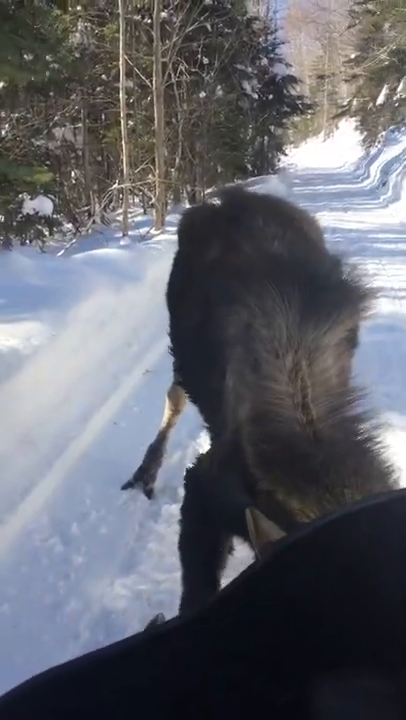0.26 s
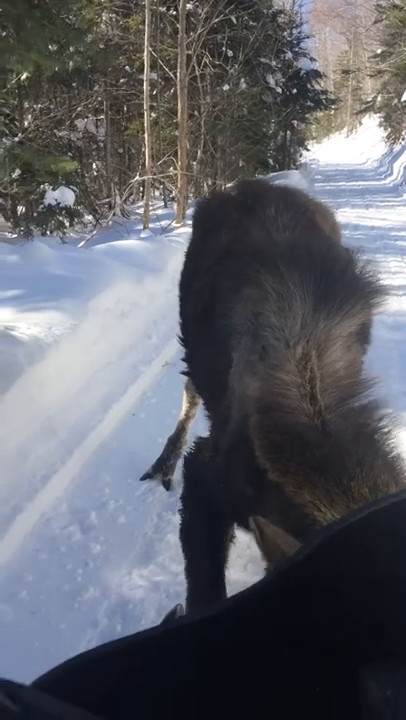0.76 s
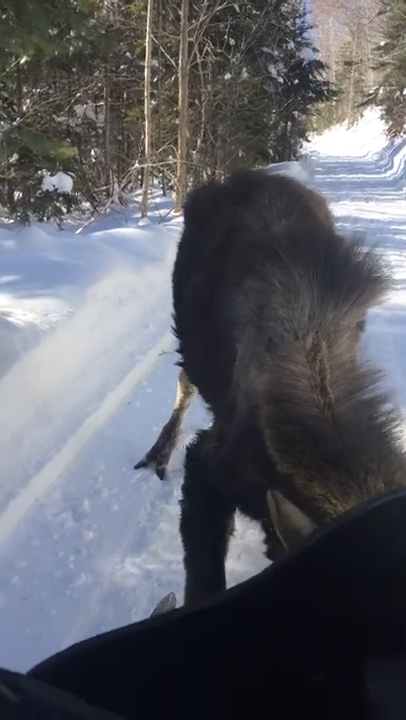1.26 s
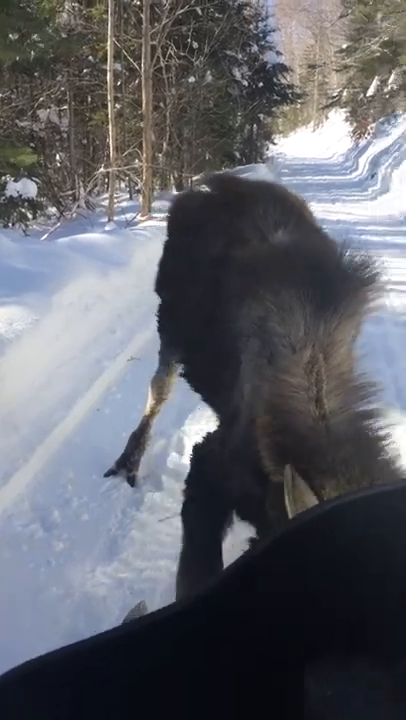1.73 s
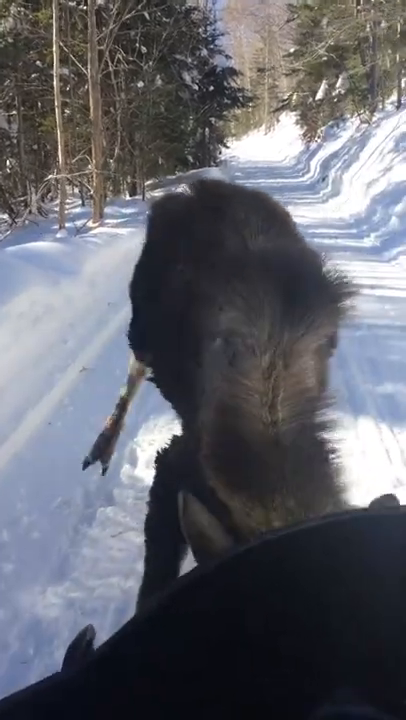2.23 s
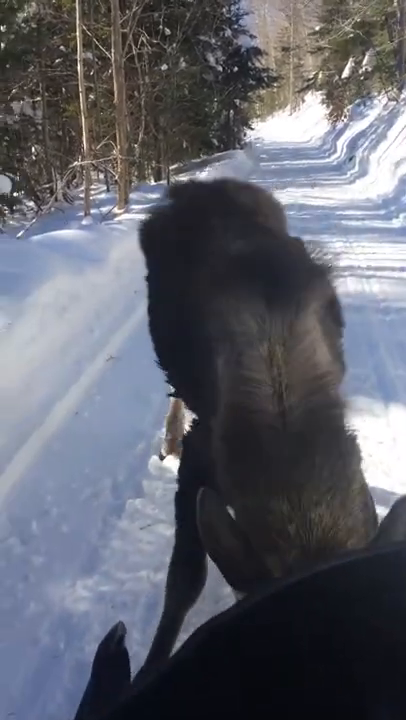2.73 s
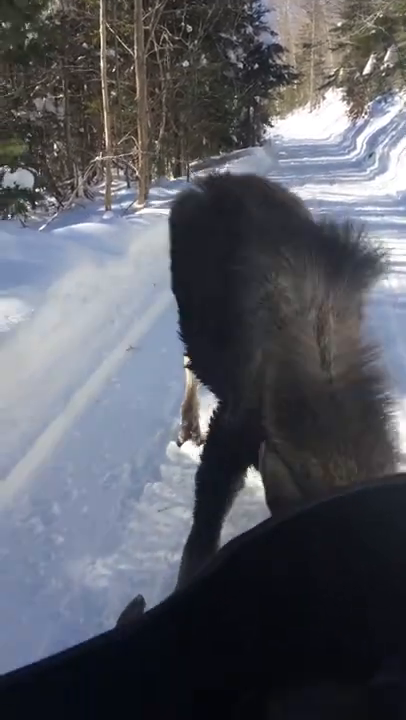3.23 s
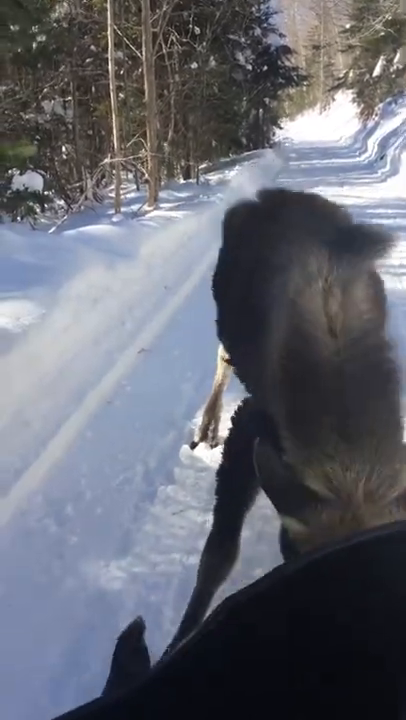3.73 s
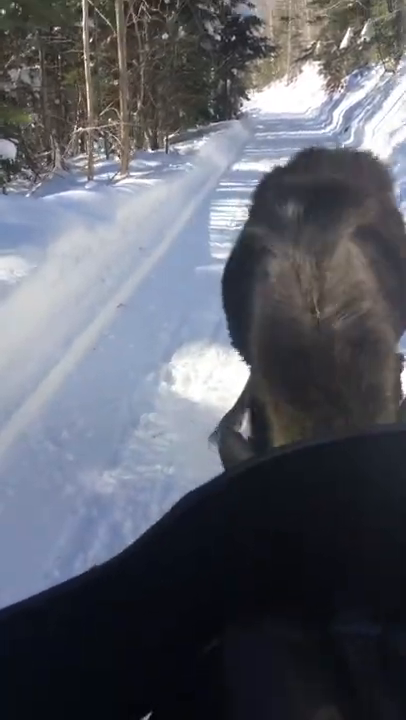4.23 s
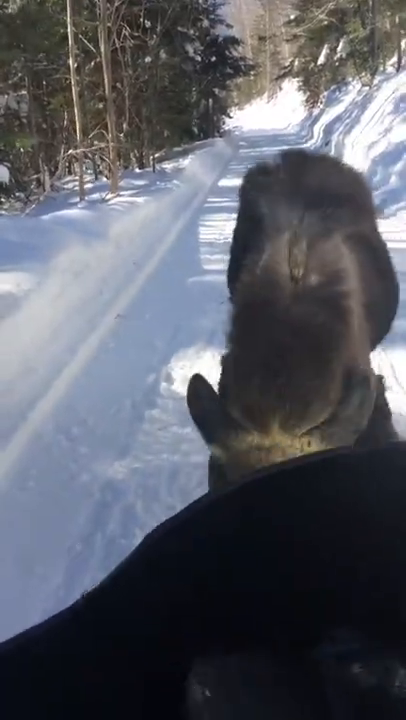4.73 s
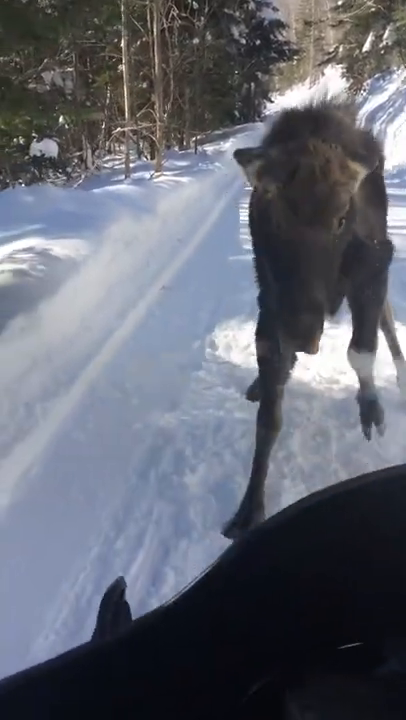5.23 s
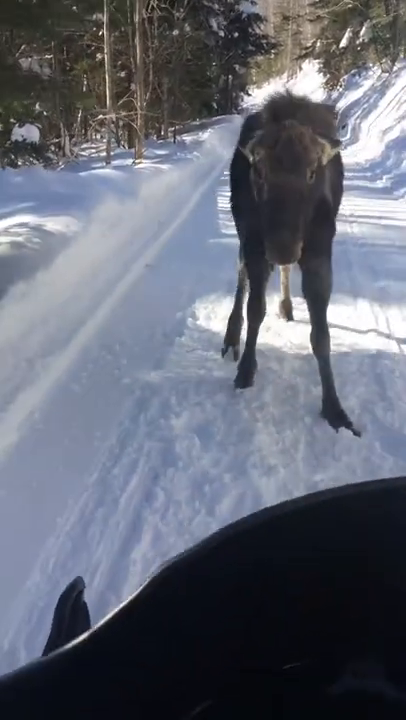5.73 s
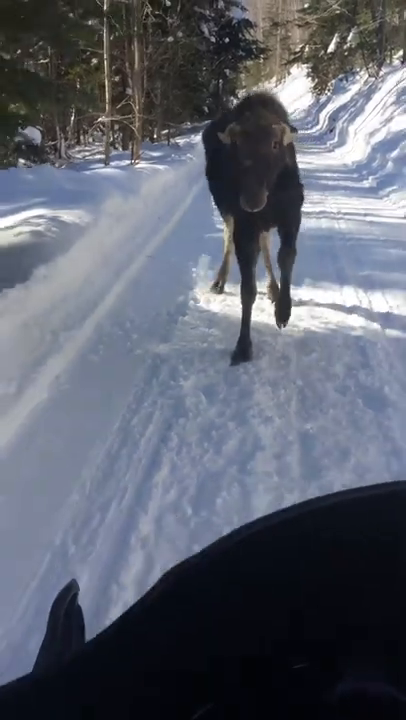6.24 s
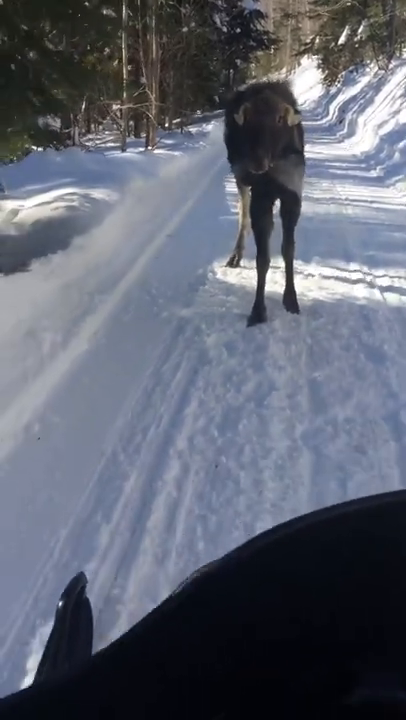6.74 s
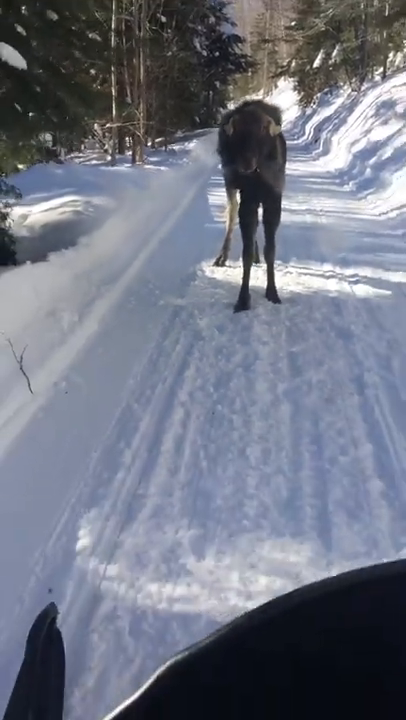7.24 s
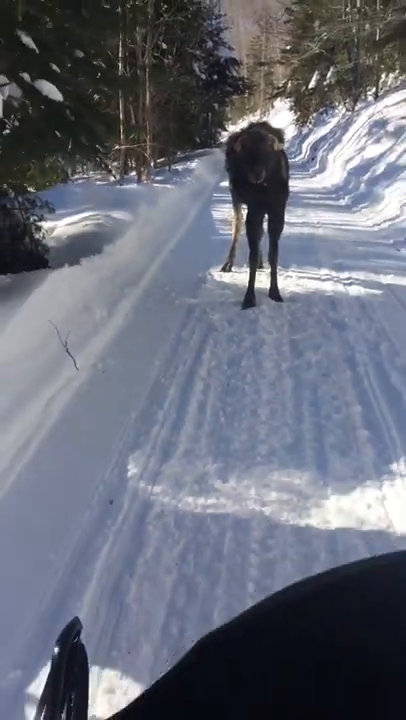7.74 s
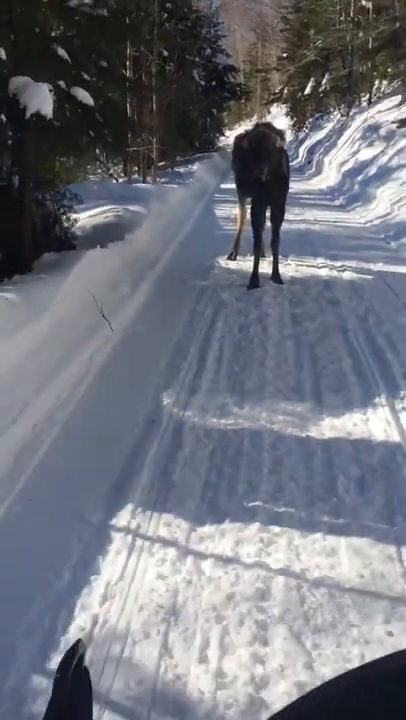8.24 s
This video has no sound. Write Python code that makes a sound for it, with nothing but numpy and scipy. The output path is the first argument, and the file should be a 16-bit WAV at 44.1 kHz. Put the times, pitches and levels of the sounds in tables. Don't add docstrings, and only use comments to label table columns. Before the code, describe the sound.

Close, loud two-stroke snowmobile idling for three seconds, then rapid repeated revs with buzzing barks, rattling parts and belt and track whirr.

```python
import sys
import numpy as np
from scipy import signal
from scipy.fft import rfft, irfft
from scipy.io import wavfile
from scipy.ndimage import uniform_filter1d, minimum_filter1d

SR = 44100
rng = np.random.default_rng(int(sys.argv[2]) if len(sys.argv) > 2 else 0)


def gain_from_db(level_db):
    decades = np.asarray(level_db, float) / 20
    return 10 ** decades


def wrap_up_sound(samples):
    columns = np.atleast_2d(samples).T
    tamed = np.clip(columns, -1, 1)
    steps = np.round(tamed * 32767).astype(np.int16)
    wavfile.write(sys.argv[1], SR, steps)


N = 373968

# start_s, speed_hz (cycles per second), bark level_db
IDLING = [
    (0.0, 37.8, -9.5),
    (0.3, 37.1, -12.5),
    (0.58, 37.12, -11),
    (1.2, 36.68, -12),
    (1.4, 35.4, -11),
    (1.56, 36.77, -11),
    (2.1, 36.78, -11.5),
    (2.65, 37.25, -10.5),
    (2.85, 39.44, -11.5),
    (2.91, 45.1, -11),
]
# first_burn_s, last_burn_s, speed_before_hz, speed_after_hz, rasp_db
BLIPS = [(2.9489, 3.021, 43.3, 65, -32.5), (3.2462, 3.4004, 54, 97, -27.5), (3.5407, 3.64, 85, 107, -23.5),
         (3.635, 3.9282, 105.5, 99.4, -28.5), (4.3559, 4.4884, 61.1, 97, -26.5),
         (4.6357, 4.7054, 77.9, 107, -24.5), (4.9196, 4.981, 76.3, 90, -25),
         (5.1538, 5.246, 74.3, 100.8, -27.5), (5.4172, 5.499, 75.34, 105.4, -25.5),
         (5.6689, 5.75, 75.5, 93.2, -27), (5.9342, 6.022, 69.37, 96.3, -28.5),
         (6.1913, 6.2775, 73.6, 103.6, -26), (6.471, 6.551, 73.4, 94.6, -28.5),
         (6.7048, 6.8773, 70.35, 113.6, -27.5), (7.3902, 7.5322, 61.9, 97.7, -29.5),
         (7.7012, 7.8248, 77.54, 113.5, -27.5), (8.0274, 8.166, 75.8, 93, -29.5)]
# first_s, last_s, bark_db
RELIGHTS = [
    (3.157, 3.157, -6.5),
    (3.4801, 3.4801, -7.0),
    (4.2254, 4.2909, -8.8),
    (4.3234, 4.3234, -6.5),
    (4.8392, 4.8392, -9.7),
    (5.864, 5.864, -9.7),
    (7.1507, 7.358, -8.7),
    (8.287, 8.3442, -8.9),
    (8.3923, 8.4739, -9.0),
]
# time_s, change_db
STUMBLES = [(2.927, -23), (3.135, -7.5), (3.175, 0), (3.443, 4), (3.5, -6), (3.53, 4), (3.96, -1),
            (4.03, 0.5), (4.106, -11.5), (4.15, -2.5), (4.516, -8), (4.8, -6.5), (5.066, -2), (5.366, -3.5),
            (5.886, -2), (6.402, 0.5), (7.094, 0.5), (7.122, -13), (7.365, -3), (7.57, 4.5), (7.64, 9.5),
            (7.97, -5), (8.0, -3), (8.268, -8), (8.38, 3)]

# order (multiple of the cycle rate), level_db
IDLE_ORDERS = [(1, -21), (2, -2.5), (3, -7), (4, -7), (5, -14), (6, -24.5), (7, -22), (8, -23.5),
               (9, -24.5), (10, -25.5), (11, -35), (12, -20), (13, -56)]
# order, level_db
BURN_ORDERS = [(1, -6), (2, 2), (3, -3.5), (4, -6), (5, -11.5), (6, -33), (7, -13), (8, -54)]
# order, level_db
LEAN_ORDERS = [(1, -7), (2, 1), (3, -9), (4, -9.5), (5, -10), (6, -29), (7, -28)]
# order, level_db
COAST_ORDERS = [(1, 0), (2, -5.5), (3, -15), (4, -27.5), (5, -23.5), (6, -38)]
# order, level_db
HOWL_ORDERS = [(4, -1.5), (5, -9)]

# freq_hz, level_db
MUFFLER = [(30, -3), (70, -2), (110, 4), (300, -2), (350, -21), (440, -16.5), (560, -22), (800, -44)]
# freq_hz, width_hz, level_db
BOOM = (86, 33, -7.5)

# time_s, change_db
PUFFS = [(0.32, 3), (0.45, 4.5), (0.57, 3.5), (0.67, 2), (0.78, -3), (0.99, 0.5), (1.06, 5), (1.14, 4.5),
         (1.25, 4.5), (1.411, 6.5), (1.57, 0), (1.65, 6), (1.832, 4.5), (1.99, 5), (2.07, 1), (2.16, 6),
         (2.249, -3), (2.4, 1.5), (2.55, 1.5), (2.71, 3.5), (2.81, 4), (2.87, 6), (2.9, 8.5)]
# freq_hz, level_db (per Hz)
SHUT_RASP = [(240, -44), (400, -2), (536, 1), (645, -10.5), (1130, 1.5), (1230, -8), (1330, 4), (1440, -3),
             (1600, 4), (2150, -3.5), (2400, -12.5), (3530, -13.5), (9920, -39), (16000, -85)]
# freq_hz, level_db (per Hz)
OPEN_RASP = [(260, -21), (450, 0.5), (674, -8), (882, -4.5), (993, 0), (1070, -6), (1150, -3.5), (1490, -1),
             (1810, 2), (2430, -6.5), (3810, -15), (9770, -23.5), (12800, -36), (16000, -54)]
# freq_hz, width_hz, level_db
CASING = [(417.6, 35, 7), (652, 11, 3.5), (972, 50, 2), (1172, 37, 7), (1517, 58, 5), (1860, 27, 8.5),
          (2184, 11, 10.5), (4770, 67, 6)]

# pitch_hz, ring_s, level_db, extra_db on every third
KNOCK = (1570, 0.1, -41, 9)
# freq_hz, level_db (per Hz)
SHAKE = [(20, -50), (40, 19.5), (80, 19), (200, 10.5), (330, -9.5), (600, -40)]
# time_s, level_db
ROLL = [(0, -43), (2.9, -45), (3.301, -32.5), (4.5, -33), (5.5, -31.5), (6.3, -32), (6.601, -31),
        (7.0, -36), (7.5, -29.5), (8.0, -32), (8.48, -31)]
# freq_hz, level_db (per Hz)
WHIRR = [(250, 3), (420, 6), (560, -7), (634, 2.5), (710, -3.5), (1200, -7.5), (1900, -4), (3000, -14),
         (8000, -22.5), (14000, -31)]
# start_s, peak_db, pitch_hz, ring_s
TICKS = [(0.048, -24, 1600, 0.028), (0.187, -27, 1390, 0.039), (1.054, -27, 1560, 0.036),
         (1.247, -43.5, 1100, 0.033), (1.381, -38, 1360, 0.02), (1.635, -37, 1590, 0.013),
         (1.66, -20.5, 1710, 0.043), (2.883, -49, 1860, 0.012), (2.934, -18, 1840, 0.056),
         (2.977, -9, 1250, 0.055), (3.053, -20, 2080, 0.086), (3.228, -10.5, 1770, 0.053),
         (3.305, -12, 1680, 0.18), (3.53, -14, 1850, 0.018), (4.201, -17, 1010, 0.046),
         (4.284, -15, 1860, 0.041), (4.315, -19, 1410, 0.012), (4.347, -14.5, 1860, 0.07),
         (4.63, -11, 2130, 0.11), (4.829, -14.5, 2180, 0.069), (4.908, -11.5, 1553, 0.087),
         (5.155, -9, 1870, 0.06), (5.922, -10.5, 1852, 0.048), (7.186, -39, 983, 0.019)]
# start_s, peak_db
CHINKS = [
    (4.1982, -26),
    (7.186, -27),
]

# time_s, jump (0-1), dip_s before it
SKIP = (0.5473, .6, .002)
# freq_hz, share (0-1)
PATCHY_TREBLE = [(11500, 0), (12500, .15), (13500, .5), (14700, .6), (15600, .35)]

IDLE_END_S = IDLING[-1][0]
FULL_HZ = 71.8
BURN_LEAD_S = 0.022


def evened(x):
    return x / np.sqrt(np.mean(x ** 2) + 1e-20)


def read(points, hz):
    f, value = np.transpose(points)
    return np.interp(np.log(hz + 1), np.log(f + 1), value)


def add(mix, s, sound):
    part = mix[round(s * SR):][:len(sound)]
    part += sound[:len(part)]


def coloured(x, gain):
    return irfft(rfft(x) * gain, len(x))


def bumps(s, events, width_s):
    return sum(db * np.exp(-((s - at) / width_s) ** 2) for at, db in events)


def pulses(turns, orders, lean):
    return evened(sum(gain_from_db(db) * np.cos(2 * np.pi * k * turns + lean) for k, db in orders))


def speed(t):
    lag_s, sag_s, end_hz = 0.0073, 0.206, 66.5
    out = np.interp(t, *np.transpose(IDLING)[:2])
    following = BLIPS[1:] + [(N / SR + BURN_LEAD_S, 0, end_hz)]
    for (first, last, low, top, _), (again, _, next_low, *_) in zip(BLIPS, following):
        up, down = first - BURN_LEAD_S, last + lag_s
        whole_sag = np.expm1(-max(again - BURN_LEAD_S - down, 1e-3) / sag_s)
        sag = np.expm1(-np.maximum(t - down, 0) / sag_s) / whole_sag
        climb = np.interp(t, [up, down], [low, top])
        out = np.where(t >= up, climb + (next_low - top) * np.minimum(sag, 1), out)
    return out


def rasp_level(step, rate):
    idle_db, coast_db, db_per_hz, puff_s = -39, -38, 0.17, 0.011
    lead_s, rise_s, fall_s = 0.023, 0.036, 0.01
    climb_db, clump_db = -2, 1.5
    linger, linger_s = 0.27, 0.02
    puffing_db = idle_db + bumps(step, PUFFS, puff_s)
    coasting_db = coast_db + db_per_hz * (rate - FULL_HZ)
    level_db = np.where(step < IDLE_END_S, puffing_db, coasting_db)
    for first, last, low, top, db in BLIPS:
        db = db - climb_db * np.clip((last - step) / (last - first), 0, 1) * (top > low)
        opened = np.minimum(step - first + lead_s, rise_s) / rise_s
        tail = linger * np.exp(-abs(step - last) / linger_s)
        closing = np.maximum(1 - (step - last) / fall_s, tail)
        opened = np.clip(np.minimum(opened, closing), 0, 1)
        level_db = np.maximum(level_db, level_db + (db - level_db) * opened)
    return level_db + clump_db * evened(uniform_filter1d(rng.standard_normal(len(step)), size=16))


def crank():
    t = np.arange(N) / SR
    step = t[::64]
    rate = speed(step)
    rasp_db = rasp_level(step, rate)
    turns = np.cumsum(np.interp(t, step, rate)) / SR
    starts = sorted([SKIP[0] + .007] + [row[0] for row in BLIPS + RELIGHTS])
    slip = np.unwrap(-np.interp(starts, t, turns) % 1, period=1)
    return turns + np.interp(t, starts, slip), np.interp(t, step, rasp_db)


def burning(s):
    first_db, last_db, margin_s = -5, -6.5, .005
    runs = [(a, b, first_db, last_db) for a, b, *_ in BLIPS] + [(a, b, db, db) for a, b, db in RELIGHTS]
    burn = np.zeros(len(s))
    for a, b, db_a, db_b in runs:
        over = b + margin_s + .008 * (b - a > .05)
        inside = (s > a - margin_s) & (s < over)
        burn = np.maximum(burn, gain_from_db(np.interp(s, [a, b + 1e-6], [db_a, db_b])) * inside)
    neighbours = np.minimum(np.roll(burn, 1), np.roll(burn, -1))
    return np.maximum(burn, neighbours * (speed(s) > 95))


def pumping(s, burn):
    level_db, db_per_hz, soft_db, soft_s, stumble_s = -7.5, 0.74, -4, 0.022, 0.012
    since = s - np.maximum.accumulate(s * (burn > 0))
    slow_db = db_per_hz * np.minimum(speed(s) - FULL_HZ, 0)
    thump_db = level_db + slow_db + soft_db * np.exp(-since / soft_s)
    return (s >= IDLE_END_S) * (burn == 0) * gain_from_db(thump_db + bumps(s, STUMBLES, stumble_s))


def exhaust(turns):
    afterfire_cycles, afterfire_depth = 4.2, .85
    cycle = np.arange(int(turns[-1]) + 3)
    s = np.interp(cycle, turns, np.arange(N) / SR)
    luck = rng.standard_normal((1000, 5))[cycle].T
    idle = (s < IDLE_END_S) * gain_from_db(np.interp(s, *np.transpose(IDLING)[::2]))
    burn = burning(s)
    coast = pumping(s, burn)
    lean = np.max([abs(s - (a + b) / 2) < (b - a) / 2 + .005 for a, b, _ in RELIGHTS], 0)

    between = np.floor(turns) + np.clip((turns % 1 - .3) / .4, 0, 1)
    spread_db = np.array([[1.3], [1.4], [1.5]])
    strengths = [idle, burn, coast] * gain_from_db(spread_db * luck[:3])
    idle, burn, coast = (np.interp(between, cycle, g) for g in strengths)
    lean = np.interp(between, cycle, lean)
    turns = turns + .010 * np.interp(between, cycle, luck[3])

    build_up = np.cos(2 * np.pi * np.cumsum(1 + .4 * luck[4]) / afterfire_cycles)
    swell = afterfire_depth * np.interp(between, cycle, build_up)
    afterfire = swell * np.cos(2 * np.pi * (turns + .4) + .25)

    idle_pulse = pulses(turns, IDLE_ORDERS, -1.2)
    bark = (1 - lean) * pulses(turns, BURN_ORDERS, 2.65) + lean * pulses(turns, LEAN_ORDERS, 2.65)
    pump = coast * (pulses(turns + .4, COAST_ORDERS, .25) + afterfire)
    boom_hz, width_hz, boom_db = BOOM
    boom = signal.lfilter(*signal.iirpeak(boom_hz, boom_hz / width_hz, SR), pump)
    pipe = idle * idle_pulse + gain_from_db(-3.0) * burn * bark + gain_from_db(-2.0) * pump + gain_from_db(boom_db) * boom
    pipe = pipe * signal.windows.tukey(N, .002)
    return coloured(pipe, gain_from_db(read(MUFFLER, np.fft.rfftfreq(N, 1 / SR))))


def rasp(turns, rasp_db):
    hz = np.fft.rfftfreq(N, 1 / SR)
    ring = 1 + sum((gain_from_db(db) - 1) / (1 + ((hz - f) / (w / 2)) ** 2) for f, w, db in CASING)
    half_turns = 2 * turns - .4
    half = np.floor(half_turns)
    size = gain_from_db(3.0 * rng.standard_normal(2000))[half.astype(int)]
    swell = np.sin(np.pi * (half_turns % 1) ** .6) ** 2
    gust = .7 + (.95 - .35 * (half % 2)) * size * swell
    grit = gain_from_db(2.2 * np.minimum(rng.exponential(1, N), 6)) * (rng.random(N) < 500 / SR)
    hiss = evened(gust * rng.standard_normal(N))
    drive = hiss + 0.47 * evened(grit * gust * rng.choice([-1., 1.], N))
    band = (hz > 900) & (hz < 3000)
    shut, wide = (gain_from_db(read(c, hz)) * ring for c in (SHUT_RASP, OPEN_RASP))
    shut, wide = (coloured(drive, g / np.sqrt(np.sum(g[band] ** 2) / len(hz))) for g in (shut, wide))
    opening = np.clip((rasp_db + 37) / 5.0, 0, 1)
    return gain_from_db(rasp_db) * (shut + opening * (wide - shut))


def valves(turns, rasp_db):
    late = turns - .28
    size = gain_from_db(2.5 * rng.standard_normal(1000))[np.floor(late).astype(int)]
    burst = size * np.exp(-(late % 1) / .14) * rng.standard_normal(N)
    bright = signal.sosfilt(signal.butter(2, [5000, 11500], "band", fs=SR, output="sos"), burst)
    return gain_from_db(rasp_db - 24) * evened(bright)


def knocks(turns):
    pitch_hz, ring_s, level_db, third_db = KNOCK
    t = np.arange(2000) / SR
    cycle = np.floor(turns - .2).astype(int)
    size = gain_from_db(level_db + third_db * (cycle % 3 == 1) + 1.8 * rng.standard_normal(1000)[cycle])
    hits = size * (np.diff(cycle, prepend=cycle[0]) > 0) * (np.arange(N) / SR < IDLE_END_S)
    ring = gain_from_db(-60 * t / ring_s) * np.sin(2 * np.pi * pitch_hz * t) * np.minimum(t / 0.0042, 1)
    return signal.oaconvolve(hits, ring)[:N]


def shake():
    noise = coloured(rng.standard_normal(N), gain_from_db(read(SHAKE, np.fft.rfftfreq(N, 1 / SR))))
    return gain_from_db(-21.5) * evened(noise)


def whirr():
    noise = coloured(rng.standard_normal(N), gain_from_db(read(WHIRR, np.fft.rfftfreq(N, 1 / SR))))
    patches = evened(uniform_filter1d(rng.standard_normal(N), size=2500))
    roll_db = np.interp(np.arange(N) / SR, *np.transpose(ROLL))
    return gain_from_db(roll_db + 2.0 * patches) * evened(noise)


def ticks():
    out, t = np.zeros(N), np.arange(1500) / SR
    for s, db, hz, ring_s in TICKS:
        crackle = signal.lfilter([.3], [1, -.7], rng.standard_normal(len(t)))
        crackle = 0.85 * signal.lfilter([.4], [1, -.6], crackle)
        strike = .5 * np.sin(2 * np.pi * hz * t) + 1.6 * crackle
        add(out, s, gain_from_db(db - 60 * t / max(ring_s, .003)) * strike / 2)
    return out


def howl(turns):
    top_db, db_per_hz, top_hz = -35, 0.45, 110.5
    step = np.arange(0, N, 64) / SR
    waver = evened(uniform_filter1d(rng.standard_normal(len(step)), size=20))
    level_db = top_db + db_per_hz * (speed(step) - top_hz) + 1.3 * waver
    return gain_from_db(np.interp(np.arange(N) / SR, step, level_db)) * pulses(turns, HOWL_ORDERS, 2.84)


def chinks():
    pitch_hz, body_hz, body_db = 4720, 1013, 9
    out, t = np.zeros(N), np.arange(1500) / SR
    for s, db in CHINKS:
        rattle = 1 + 0.66 * evened(uniform_filter1d(rng.standard_normal(len(t)), size=25))
        body = gain_from_db(body_db) * np.sin(2 * np.pi * body_hz * t)
        pair = rattle * np.sin(2 * np.pi * pitch_hz * t) + body
        add(out, s, gain_from_db(db - 60 * t / 0.03) * pair * np.minimum(t / 0.0023, 1))
    return out


def scene():
    turns, rasp_db = crank()
    engine = exhaust(turns) + rasp(turns, rasp_db) + valves(turns, rasp_db) + howl(turns)
    sled = knocks(turns) + shake() + whirr() + ticks() + chinks()
    return (engine + sled)[None]


def thinned(x):
    hz, t, z = signal.stft(x, SR, nperseg=1024)
    chance = uniform_filter1d(rng.standard_normal((len(t), 80)), size=9, axis=0)
    rank = chance.argsort(0).argsort(0) / len(t)
    share = read(PATCHY_TREBLE, hz)[:, None]
    kept = rank[:, np.arange(len(hz)) // 9].T >= share
    return signal.istft(z * kept / np.sqrt(1 - share), SR, nperseg=1024)[1][:, :N]


def top_cut(x):
    return signal.sosfilt(signal.butter(12, 15800, fs=SR, output="sos"), x)


def record(dry):
    faded = dry * np.minimum(np.arange(N) / 300, 1)
    cut = signal.sosfilt(signal.butter(1, 30, "high", fs=SR, output="sos"), faded)
    cut = signal.sosfilt(signal.butter(4, 13500, fs=SR, output="sos"), cut)
    headroom = minimum_filter1d(1 / np.maximum(abs(cut) / .99, 1), size=601)
    held = cut * uniform_filter1d(headroom, size=601)
    skip_s, jump, dip_s = SKIP
    dip = np.arange(-600, 0) / SR
    add(held[0], skip_s + dip[0], -jump * np.exp(dip / dip_s))
    mix = thinned(np.clip(held, -1, 1))
    return top_cut(mix)


dry = scene()
out = record(dry)
wrap_up_sound(out)
```